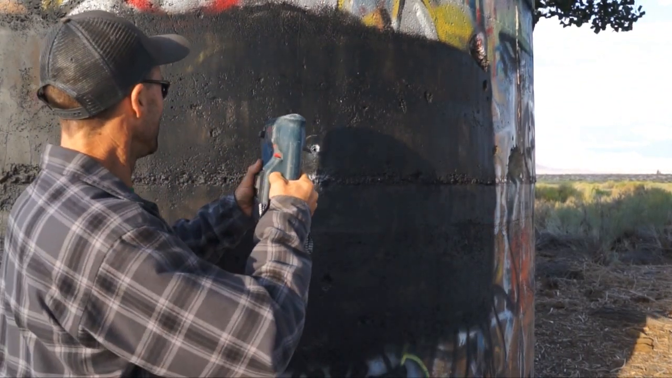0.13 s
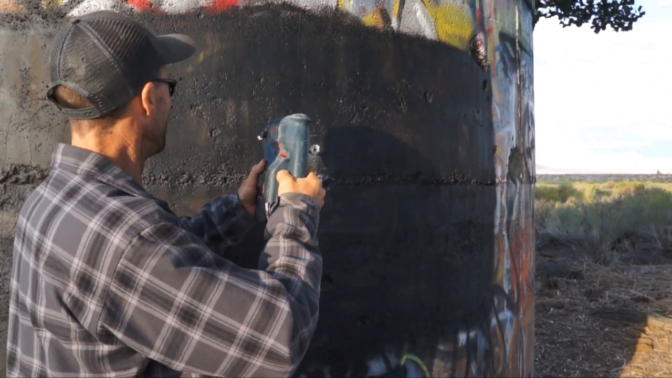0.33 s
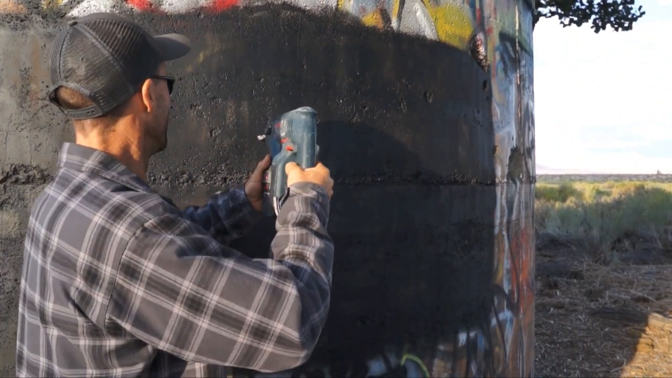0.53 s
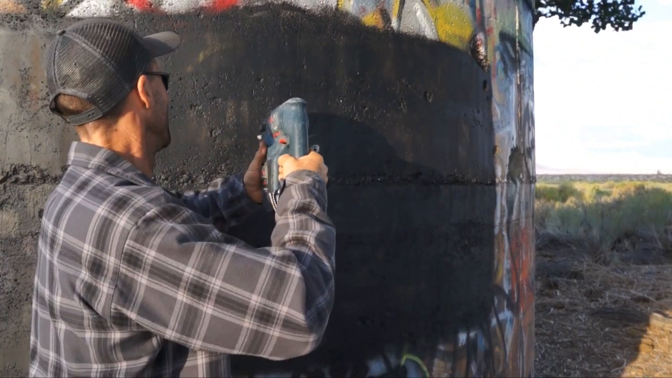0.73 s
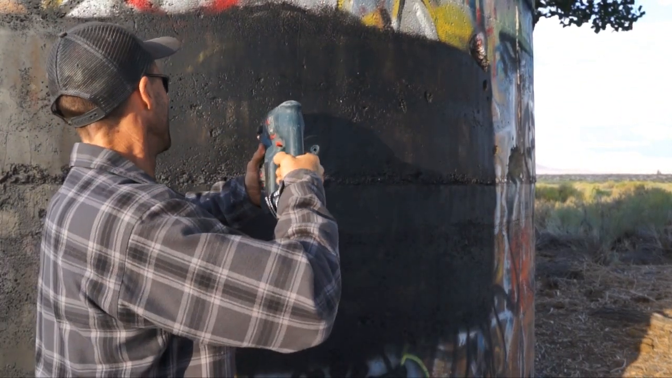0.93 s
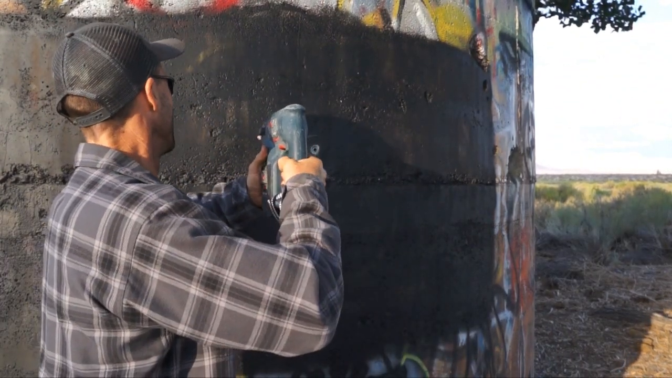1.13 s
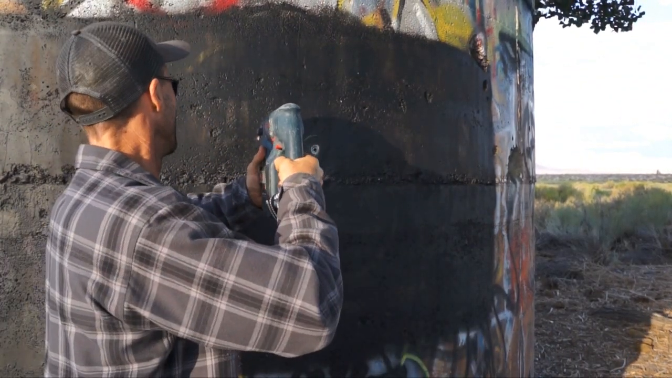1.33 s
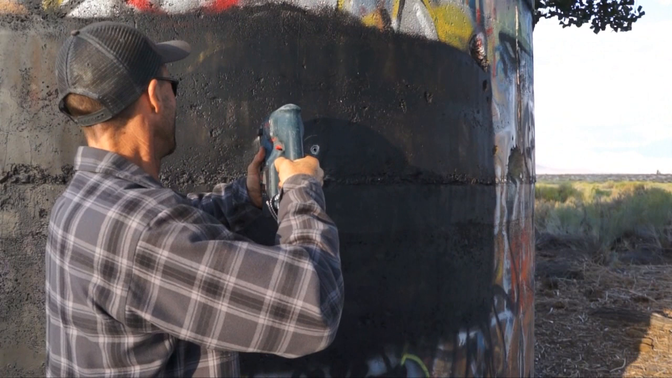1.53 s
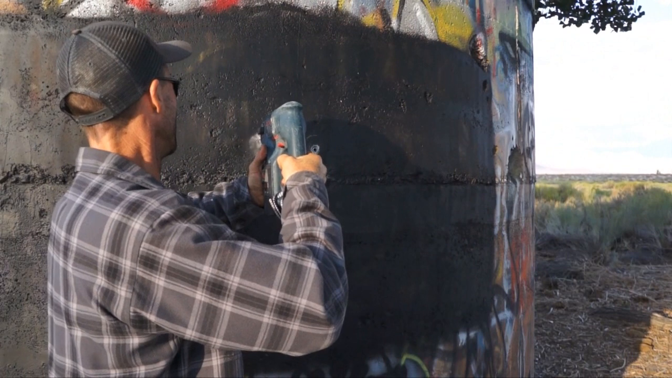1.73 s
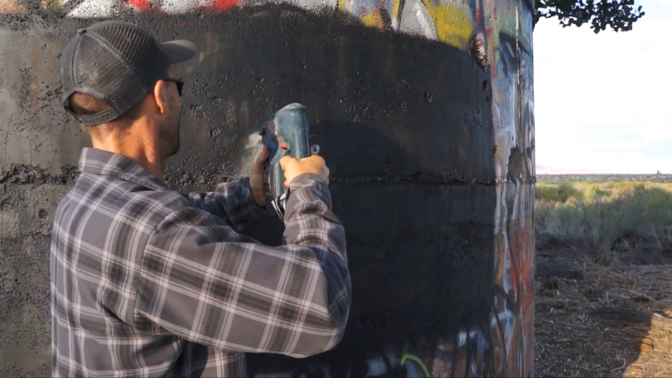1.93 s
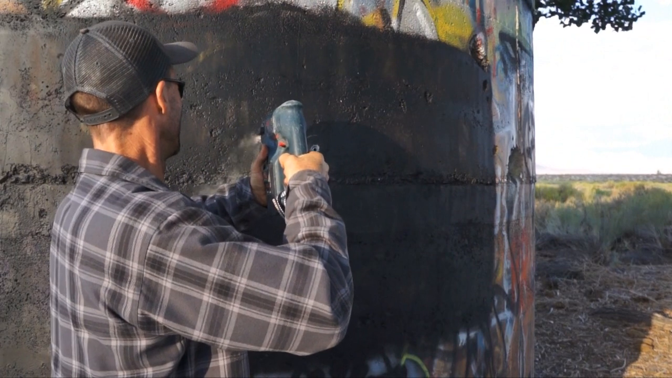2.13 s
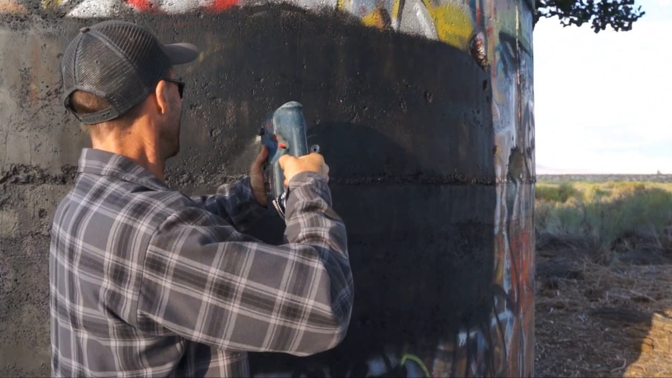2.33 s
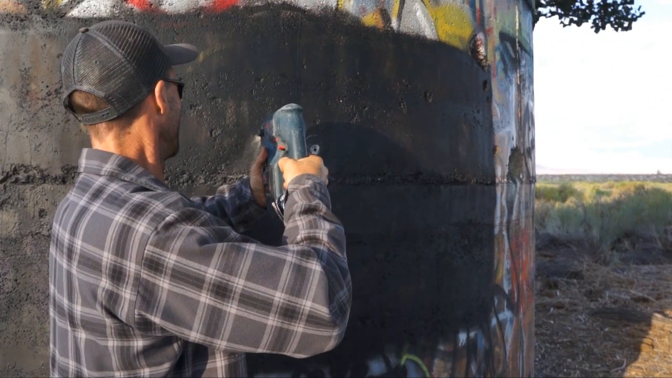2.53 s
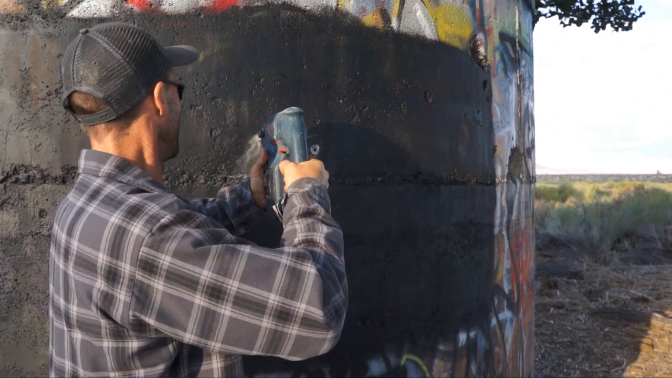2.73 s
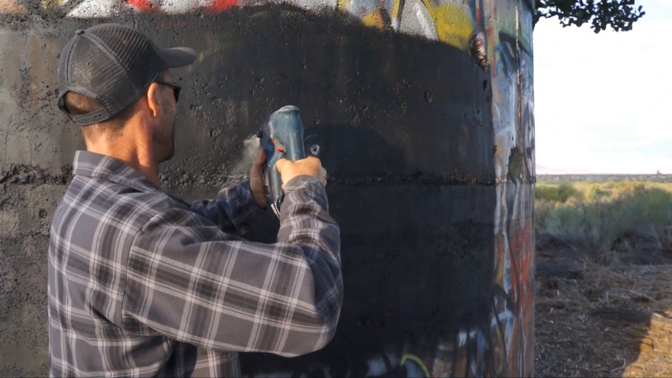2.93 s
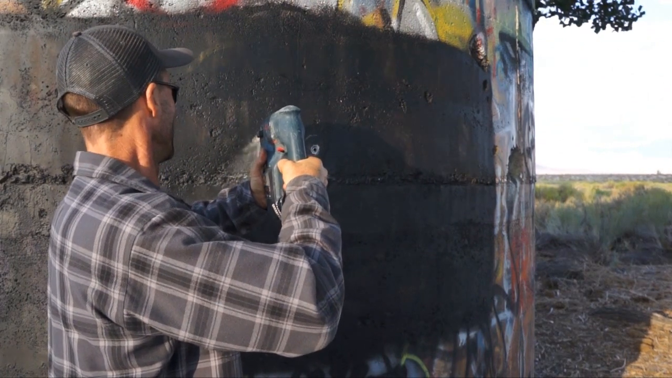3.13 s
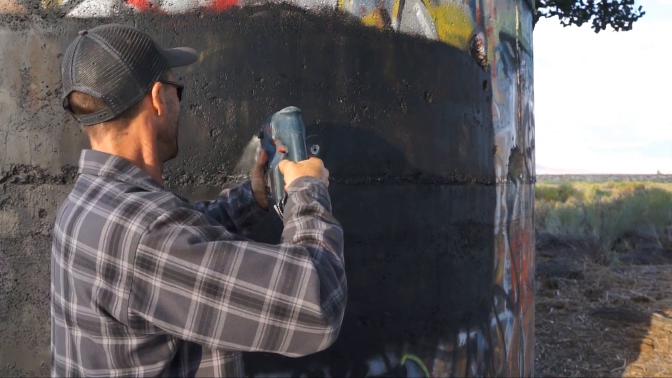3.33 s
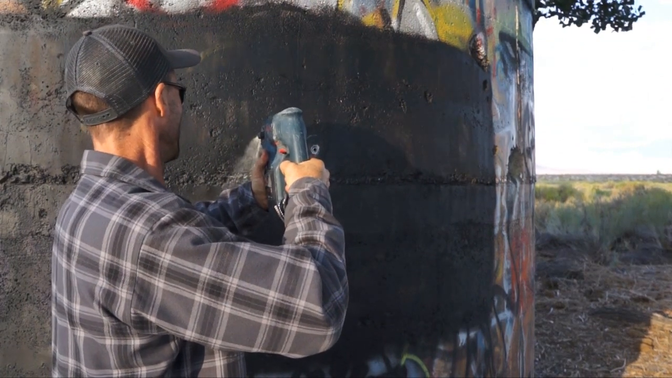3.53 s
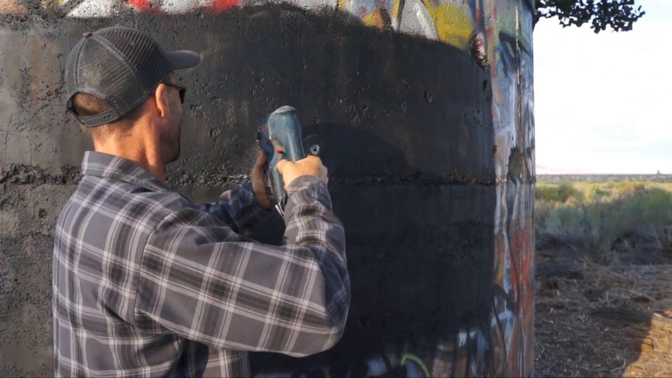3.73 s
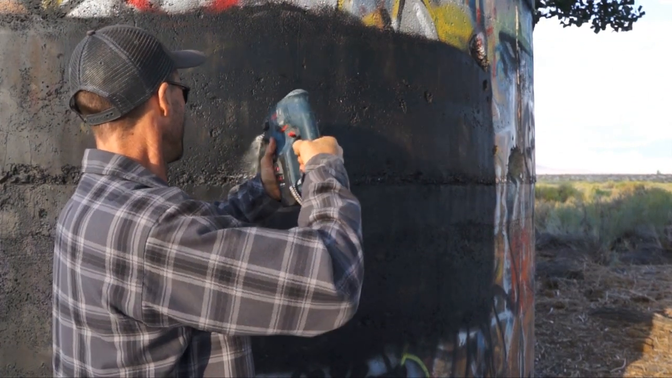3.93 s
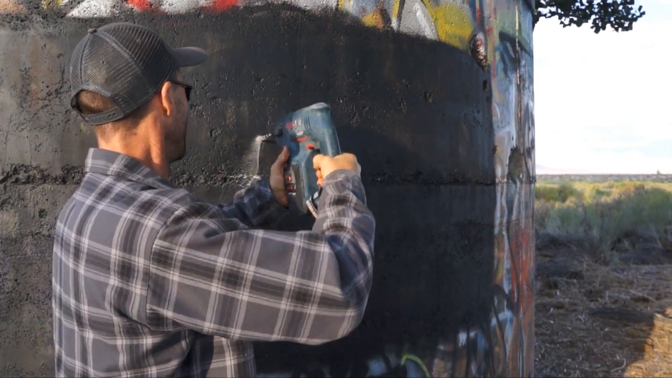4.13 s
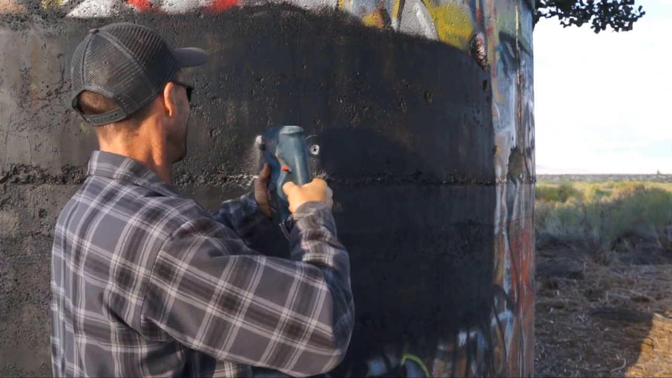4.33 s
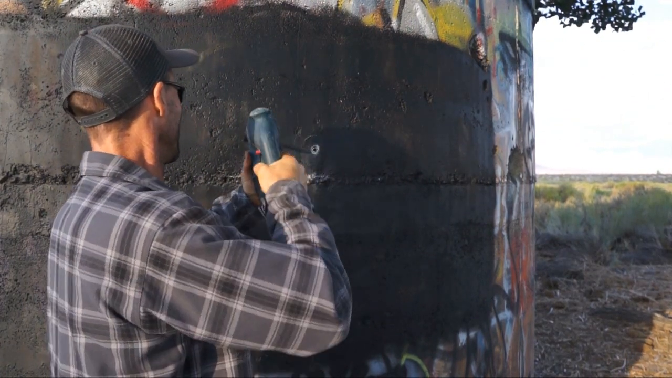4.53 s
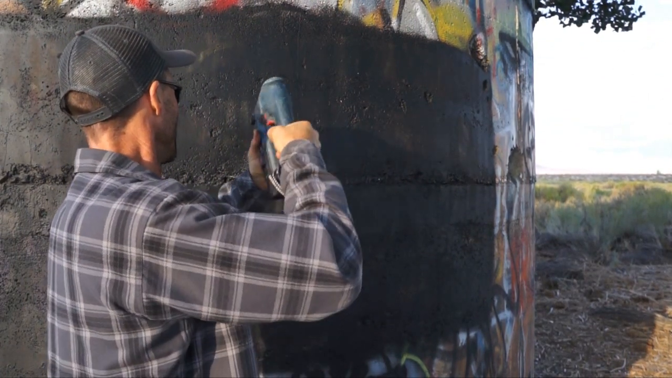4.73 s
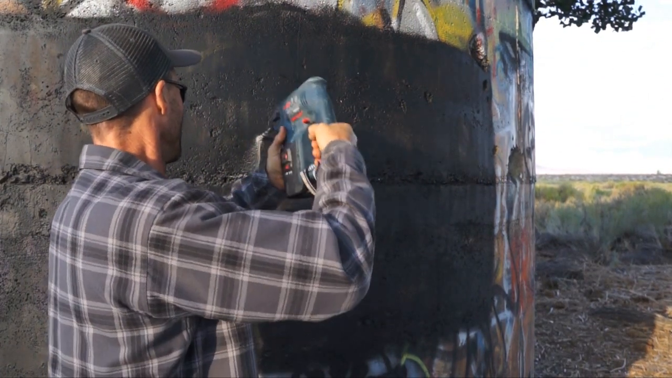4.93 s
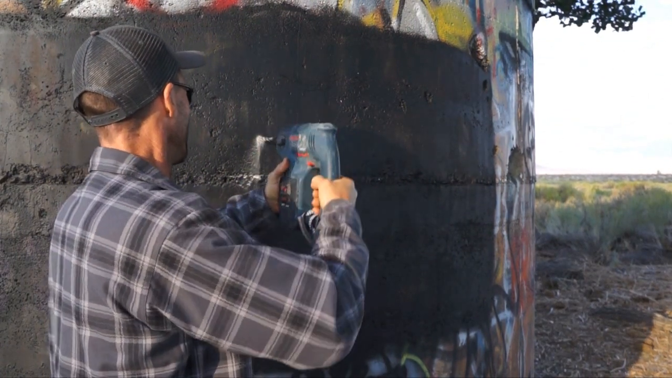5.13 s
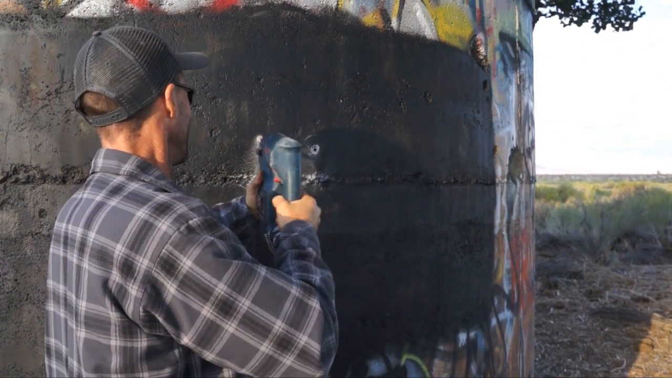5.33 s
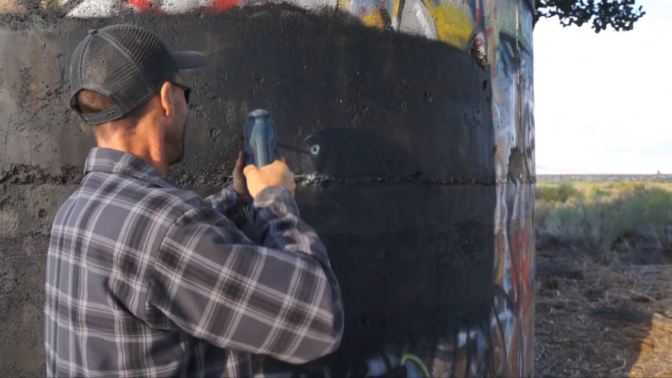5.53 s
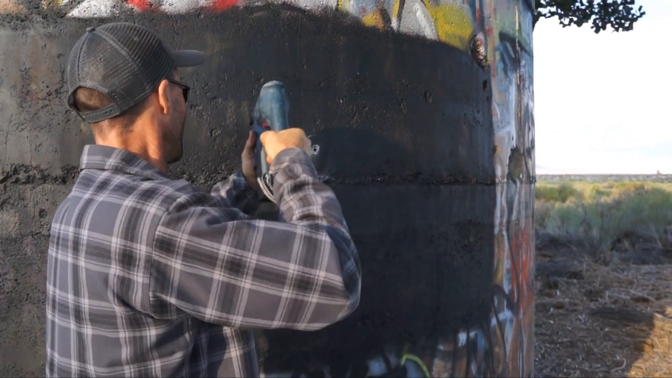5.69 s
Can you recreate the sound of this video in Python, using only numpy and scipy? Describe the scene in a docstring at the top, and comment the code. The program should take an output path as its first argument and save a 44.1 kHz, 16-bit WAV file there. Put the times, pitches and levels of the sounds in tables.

```python
"""Quiet open air outdoors; a tip taps, slides and rubs on a concrete wall while a rotary hammer is aimed, a little left.
The motor starts with fan air, grinding grit and a whine of gear tones. Pressed home twice, with a loose stretch between,
the piston strikes once a cycle and the bit rebounds and rings; eased off, the bit rattles, bounces and knocks in the hole.
The motor coasts, restarts for a short third spell of blows, then goes on rattling loosely to the end.
Contacts and air are shaped noise, ringing parts are damped resonances, and the whine is a set of sines."""
import sys
import numpy as np
from scipy import signal
from scipy.fft import rfft, irfft, next_fast_len
from scipy.io import wavfile
from scipy.ndimage import uniform_filter1d

SR = 44100
rng = np.random.default_rng(int(sys.argv[2]) if len(sys.argv) > 2 else 0)


def to_wav(sig):
    """Store sig (one row per channel, or 1-D mono) as 16-bit WAV at the path in sys.argv[1].

    Samples outside -1..1 are clipped; the rate is SR.
    """
    pcm = np.clip(np.atleast_2d(sig), -1, 1) * 32767
    pcm = np.round(pcm).astype(np.int16)
    wavfile.write(sys.argv[1], SR, pcm.T)  # frames by channels


N = 254016
TIME = np.arange(N) / SR  # s
# filter bins in Hz, padded so that ringing does not wrap around
FREQ = np.maximum(np.fft.rfftfreq(2 * next_fast_len(N // 2 + SR // 8, True), 1 / SR), 1)
SIZE = 2 * (len(FREQ) - 1)
FULL_SPEED_HZ = 75  # piston cycles a second


def undb(db):
    """Decibels to gain."""
    return 10 ** (np.asarray(db) / 20)


def curve(rows, axis=1):
    """One column of a table, joined by straight lines in time."""
    rows = np.asarray(rows)
    return np.interp(TIME, rows[:, 0], rows[:, axis])


def spectrum(rows, axis=1):
    """One column of a table, joined by straight lines over log frequency."""
    rows = np.asarray(rows)
    return np.interp(np.log(FREQ), np.log(rows[:, 0]), rows[:, axis])


def response(points, lifts=()):
    """Causal filter of unit power from a spectrum with resonant lifts."""
    db = spectrum(points)
    for hz, width, lift in lifts:
        db = db + lift / (1 + (2 * (FREQ - hz) / width) ** 2)
    # folding the cepstrum onto positive time gives minimum phase
    cepstrum = irfft(np.log(undb(db)))
    h = np.exp(rfft(cepstrum * 2 * (np.arange(SIZE) < SIZE // 2)))
    return h / np.sqrt(np.mean(abs(h) ** 2))


def modes(rows, order=1):
    """Damped resonances in parallel, of unit power; order 2 swells before it fades."""
    h = 0
    for k, (hz, width, db) in enumerate(rows):
        resonance = 1 / (1 + 1j * (FREQ ** 2 - hz ** 2) / (FREQ * width)) ** order
        h = h + (-1) ** k * undb(db) * resonance  # alternate signs
    return h / np.sqrt(np.mean(abs(h) ** 2))


def through(x, h):
    """Pass a signal through a filter."""
    return irfft(rfft(x, SIZE) * h)[:N]


# The microphone pair. Each row: frequency in Hz, left minus right in dB, unrelated share in dB.
MIC_PAIR = [(100, 0.5, -18), (724, 2, -19), (1500, 3.5, -9), (2800, 1.5, -14), (4700, 4, -4.5),
            (9250, 8.5, -8.5), (11100, 1.5, -8.5), (15000, 0.5, -2.5)]


def excite(envelope, h, treble_db=0, split_hz=4500):
    """Contact noise under an envelope drives a filter; the two capsules hear it partly alike."""
    drive = envelope * rng.standard_normal((2, N))
    upper = 1 / (1 + (split_hz / FREQ) ** 4)
    tilt = undb(treble_db / 2)
    bright = rfft(drive * tilt, SIZE) * upper
    dull = rfft(drive / tilt, SIZE) * (1 - upper)
    mid, side = h * (bright + dull)
    sides = np.array([[1], [-1]])
    pair = mid + sides * side * undb(spectrum(MIC_PAIR, axis=2))
    balance = undb(sides * spectrum(MIC_PAIR) / 2)
    return irfft(pair * balance)[:, :N]


def bursts(times, sizes, hold_s, t60_s):
    """Envelope of contacts that last a moment and then die away; they add in power."""
    power = np.zeros(N)
    for t, size, hold, t60 in np.broadcast(times, sizes, hold_s, t60_s):
        start = int(np.clip(t * SR, 0, N))
        age = TIME[:min(int((hold + t60) * SR), N - start)]
        decay = np.exp(-np.log(1000) * np.maximum(age - hold, 0) / t60)
        power[start:start + len(age)] += (size * decay) ** 2
    return np.sqrt(power)


def swells(rows):
    """Envelope of movements that swell and fade smoothly."""
    return sum(undb(db) * np.exp(-((TIME - middle) / half) ** 2) for middle, half, db in rows)


def wobble(rate):
    """Random levels held 1 / rate s and slewed, scaled to unit spread."""
    k = max(int(SR / rate), 1)
    steps = np.repeat(rng.standard_normal(N // k + 1), k)[:N]
    slewed = uniform_filter1d(steps, k)
    return slewed / slewed.std()


def held(times, values):
    """Each event's value holds until the next event, taking over 2 ms early."""
    return values[np.maximum(np.searchsorted(times, TIME + .002) - 1, 0)]


def spells(rows, values, rest):
    """A control that moves to each spell's value while the spell lasts and rests in between."""
    grip_change_s = 0.036
    control = rest
    for (start, end, *_), value in zip(rows, values):
        gate = np.clip(np.minimum(TIME - start, end - TIME) / grip_change_s + .5, 0, 1)
        control = control + gate * (value - rest)
    return control


# Colour of the open air. Each row: frequency in Hz, density in dB per Hz.
AIR = [(15, -28), (25, -15.5), (62, -17), (95, -10), (181, -8), (501, -8.5), (588, -1.5), (709, -14),
       (1280, -10), (1760, -15), (11800, -26), (13100, -32), (15000, -39)]


def outdoors():
    """Quiet open air, as slowly wavering noise with a faint high hiss."""
    lifts = [(616, 73, 3.9), (1390, 300, 4), (12950, 350, 10)]  # Hz, width Hz, dB
    return excite(undb(-62.5 + 1.6 * wobble(15)), response(AIR, lifts))


# Sleeve and glove rub while aiming. Each row: middle in seconds, half length in seconds, level in dB.
RUB = [(.1, .25, -69), (.355, 0.042, -55), (.97, 0.065, -53), (1.15, 0.14, -63)]
# The tip slides on the wall. Each row: middle in seconds, half length in seconds, level in dB.
SLIDE = [(.762, 0.036, -53.5), (.93, 0.12, -61.5)]
# Soft handling bumps. Each row: start in seconds, level in dB, t60 in seconds.
BUMPS = [(.064, -45, 0.16), (.1, -59, 0.14), (.335, -60, .3), (.385, -55, 0.31), (.93, -63, 0.6)]
# Taps of the tip on the wall and clicks of the tool. Each row: start in seconds, level in dB before a trim,
# treble against the middle in dB, t60 in seconds.
TAPS = [(.298, -48, -18, .05), (.321, -31, 0.5, 0.044), (0.627, -48, 6, .03), (0.7, -39.5, 3, 0.023),
        (0.928, -32.5, 3, 0.02), (.955, -43, -6, .03), (0.97, -33.5, -8, 0.011), (0.988, -38, -8, 0.019),
        (1.112, -35.5, 1, 0.029), (1.191, -52, -8, .027), (1.238, -29.5, 12.5, 0.076),
        (1.264, -33, -12, 0.1), (1.285, -18.5, 12, 0.061), (3.769, -24.5, 26, 0.011)]
# Colour of a tap. Each row: frequency in Hz, density in dB per Hz.
TAP_COLOUR = [(60, -33), (300, -8.5), (800, 4.5), (1100, 4.5), (1600, -1), (2400, -7), (3500, -10),
              (6000, -17), (9000, -15), (12000, -26), (15000, -47)]


def aiming():
    """The tip taps and slides on the concrete; cloth rubs and the grip bumps softly."""
    t, db, treble, t60 = np.transpose(TAPS)
    contacts = bursts(t, undb(db - 2.5), hold_s=0.0005, t60_s=t60)
    taps = excite(contacts, response(TAP_COLOUR, BODY), treble_db=held(t, treble))
    # colours below: Hz, dB per Hz
    cloth = response([(60, -5), (300, -3.0), (1100, -2.0), (3000, -17.5), (10000, -29), (15000, -40)])
    catching = undb(2.5 * wobble(150))
    rub = excite(swells(RUB) * catching, cloth)
    scrape = response([(200, -1), (1500, 0), (4000, -7), (9000, 1), (12000, -11), (15000, -22)])
    slide = excite(swells(SLIDE), scrape)
    t, db, t60 = np.transpose(BUMPS)
    soft = response([(20, -3), (60, 6), (180, -1), (320, -34), (1500, -60)])
    bumps = excite(bursts(t, undb(db), hold_s=0.0066, t60_s=t60), soft)
    return taps + rub + slide + bumps


# The motor starts, bogs down as the bit bites, runs up, coasts and restarts.
# Each row: time in seconds, piston cycles a second.
SPEED = [(1.23, 15.0), (1.31, 45.6), (1.42, 44.8), (1.53, 33.9), (1.615, 33.1), (1.72, 65.7), (1.79, 73.2),
         (2.62, 75.2), (2.72, 79.0), (3.05, 75.8), (3.57, 74.2), (3.75, 35.8), (3.84, 67.0), (4.0, 71.2),
         (4.16, 76.2), (4.62, 74.7), (5.45, 76.5), (5.76, 73.5)]


def motor_speed():
    """Piston rate over time, which sets every cycle and tone of the tool."""
    return curve(SPEED)


# Trigger held. Each row: on in seconds, off in seconds.
TRIGGER = [(1.232, 3.58), (3.736, 5.9)]


def motor_power():
    """Level against full power (dB): a quick rise when the trigger is pulled, a slower fall as the motor coasts."""
    spin_up_s, spin_up_db_per_s, coast_db_per_s = .065, 546, 248
    pulls = []
    for on, off in TRIGGER:
        rise = spin_up_db_per_s * (TIME - on - spin_up_s)
        fall = coast_db_per_s * (off - TIME)
        pulls.append(np.minimum(rise, fall))
    return np.clip(np.max(pulls, axis=0), -90, 0)


# Strokes with the bit loose in the hole. Each row: start in seconds, end in seconds, rattle in dB,
# grinding in dB, free running in dB (raises the whine tones by their own growth).
EASED = [(2.066, 2.673, -23.5, -24, -3), (3.954, 4.232, -38.5, -26.5, 4.5), (4.24, 4.613, -28.5, -26, -8),
         (4.61, 4.89, -25, -24, 0.5), (4.9, 5.177, -27, -25, 6.5), (5.19, 5.9, -26.5, -26, -5)]


def looseness():
    """1 while the bit is loose in the hole, else 0, with short ramps between."""
    return spells(EASED, np.ones(len(EASED)), rest=0)


# Colour of fan and grit. Each row: frequency in Hz, density in dB per Hz.
WHIRR = [(29, -52), (50, -39), (91, -37), (141, -22.5), (311, -13.5), (446, -8.5), (596, -5.5), (1040, -3),
         (1890, -4), (2580, -4.5), (3060, -2.5), (4600, -6), (9250, -3), (11500, -11), (15700, -27.5)]
# The housing booms when the motor labours or the load comes off.
# Each row: middle in seconds, half length in seconds, level in dB.
BOOM = [(1.55, .1, -42.5), (2.02, 0.058, -50.5), (3.59, 0.063, -45.5), (3.94, 0.031, -47), (4.8, .09, -49)]
# Motor and gear tones. Each row: multiple of the piston rate, level in dB, dB gained per dB of free running.
TONES = [(2, -65, .1), (20, -46, .2), (35, -42, .5), (70, -43, .8), (93.4, -49, 1), (114, -47, .8)]


def machine(turns):
    """Fan air and flutes grinding grit, a booming housing, and the slightly unsteady tones of armature and gears."""
    loaded_grind_db, loaded_free_db = -23.5, -37
    *_, grind_db, free_db = np.transpose(EASED)
    power = motor_power()
    grit = undb(2.7 * wobble(1500) + 1.47 * wobble(120) - 3.0)
    # brighter when loose and with motor power
    treble = -2 + 2.5 * looseness() + 0.13 * power
    level = undb(spells(EASED, grind_db, rest=loaded_grind_db) + power)
    whirr = excite(level * grit, response(WHIRR, BODY), treble_db=treble)
    boom = excite(swells(BOOM), modes([(150, 60, -2), (272, 50, 0)], order=2))
    shaft = turns + .0009 * wobble(60)
    free = spells(EASED, free_db, rest=loaded_free_db)
    tones = 0
    for order, db, growth in TONES:
        loudness = np.sqrt(2) * undb(db + growth * free + 1.94 * wobble(40))
        tones = tones + loudness * np.sin(2 * np.pi * order * shaft)
    # the piston's load roughens the whine once a cycle
    tones = tones * (1 + .5 * np.cos(2 * np.pi * turns)) * undb(3 * wobble(350) - 1.5)
    # the whine falls away steeply as the motor slows
    whine = tones * (motor_speed() / FULL_SPEED_HZ) ** 5 * undb([[2.5], [-.5]])
    return whirr + boom + whine


# Resonances of steel bit and housing. Each row: frequency in Hz, width in Hz, lift in dB.
BODY = [(260, 9.9, 5.5), (462, 29, 5), (780, 31, 4), (1054, 52, 3), (1247, 73, 3.5), (1486, 37, 7.5),
        (1764, 49, 5), (1860, 17, -9.5), (2225, 230, 5.5), (2620, 110, 7), (3460, 1700, -1), (4360, 140, 3),
        (7170, 570, 2.5), (8600, 200, 0.5), (9470, 2140, 6)]
# Colour of the loose bit. Each row: frequency in Hz, density in dB per Hz.
LOOSE = [(47, -59), (80, -47), (145, -17.5), (270, -9.5), (315, -11.5), (778, 1), (1350, -1), (1480, 0.5),
         (1880, -4.5), (2620, 0), (3130, -3), (4660, -5), (9240, -4), (11500, -4.5), (15700, -36)]
# The hardest knocks of the loose bit. Each row: start in seconds, level in dB before a trim,
# treble against the middle in dB before scaling and trim.
KNOCKS = [(1.304, -21, -2), (1.326, -16, 2), (2.062, -14.5, -4), (2.164, -16.5, -8), (2.214, -20, -6),
          (2.268, -18, -7), (2.384, -14.5, 1), (2.408, -14.5, 0), (2.573, -12.5, 2), (2.624, -13.5, 1),
          (3.995, -21.5, 13), (4.023, -16.5, 8.5), (4.222, -16, 4.5), (4.259, -18.5, 7), (4.354, -14.5, 6),
          (4.363, -15, 9), (4.411, -15, 5), (4.432, -18, -4), (4.506, -22, 10), (4.564, -19, 1),
          (4.62, -18, -4), (4.764, -22, -9), (4.864, -18.5, -5), (4.921, -12.5, 6), (5.092, -16, 10),
          (5.155, -18, 11), (5.208, -13.5, 6), (5.233, -14.5, 3), (5.263, -16.5, 7), (5.344, -14.5, 7),
          (5.457, -17.5, -1), (5.508, -19.5, -6), (5.588, -14, 0), (5.618, -16.5, 5)]
# Spells with the bit pressed home. Each row: first blow in seconds, end in seconds, blow in dB at full speed,
# bit ring in dB at full speed, rebound chirp in dB before a trim, crack treble in dB, rattle in dB.
PRESSED = [(1.3337, 2.005, -19.5, 2.5, -6.5, -1.5, -27), (2.6675, 3.574, -21.5, 1.5, -13, 1.5, -33),
           (3.796, 3.94, -23.5, 3.5, -11, 2, -29)]


def rattle(turns):
    """The loose bit hits the hole at chance moments in each cycle, bounces off its bottom and knocks hard at set times."""
    levels = [row[-1] for row in PRESSED] + [row[2] for row in EASED]
    play = undb(spells(PRESSED + EASED, levels, rest=-45) + motor_power())
    # two small contacts a cycle
    cycles = np.arange(0, turns[-1], .5)
    chance = rng.uniform(-1, 1, (len(cycles), 3)).T
    t = np.interp(cycles + .3 * chance[0], turns, TIME)
    small = bursts(t, undb(1.0 + 4.0 * chance[1]), hold_s=0.0012, t60_s=0.021 * np.exp(.5 * chance[2]))
    # bounces off the bottom of the hole, mostly a bright clink
    bounce_s, jitter_s, bounce_db, scatter_db = .0245, .006, 2, 2.5  # levels against the rattle
    chance = rng.uniform(-1, 1, (N // 800, 2)).T
    t = bounce_s * np.arange(len(chance[0])) + jitter_s * chance[0]
    bounces = bursts(t, undb(bounce_db + scatter_db * chance[1]), hold_s=0.0017, t60_s=0.011) * looseness()
    t, db, treble = np.transpose(KNOCKS)
    hard = bursts(t, undb(db - 2), hold_s=.002, t60_s=.018)
    h = response(LOOSE, BODY)
    return (excite(small * play, h, treble_db=2.5 * wobble(120))
            + excite(bounces * play, h, treble_db=3.5 + 3.5 * wobble(40))
            + excite(hard, h, treble_db=1.05 * held(t, treble) - 2.5))


# Colour of a blow on the stone. Each row: frequency in Hz, density in dB per Hz.
STRIKE = [(59, -57), (100, -69), (140, -58), (223, -22), (421, -24), (762, -1), (1380, -4.5), (1470, 2.5),
          (1890, -1), (2550, 4), (2890, -20), (3890, -3), (10100, 1), (14100, -7), (15700, -46)]
# Modes of the bit under a full blow. Each row: frequency in Hz, width in Hz, level in dB.
BIT = [(2490, 350, 3.5), (9000, 100, -2.5), (10280, 760, 2.5)]
# Low modes of housing and wall, shaken by each blow. Each row: frequency in Hz, width in Hz, level in dB.
SHELL = [(79, 26, -28), (146.3, 8.9, -5), (226, 33, -2.5), (289, 26, 1.5), (386, 23, 1), (469, 42, 1.5),
         (539, 68, 5), (874, 395, 4.5)]


def hammer(turns):
    """One blow a cycle while pressed home; a few milliseconds later the bit rebounds and chatters in the chuck."""
    blow_times = []
    for start, end, *_ in PRESSED:
        first, last = np.interp((start, end), TIME, turns)
        blow_times.append(np.interp(np.arange(first, last), turns, TIME))
    t = np.concatenate(blow_times)
    chance = rng.uniform(-0.71, 1, (len(t), 6)).T
    starts, _, blow_db, ring_db, chirp_db, treble_db, _ = np.transpose(PRESSED)
    # dB per octave of speed: harder and ringing when fast, shaking when slow
    blow_db_per_oct, ring_db_per_oct, shake_db_per_oct = 2, 3.5, -5
    octaves = np.log2(motor_speed() / FULL_SPEED_HZ)
    force = undb(held(starts, blow_db) + blow_db_per_oct * octaves)
    ring = undb(held(starts, ring_db) + ring_db_per_oct * octaves)
    shake = undb(-15.5 + shake_db_per_oct * octaves)
    size = undb(1.0 * chance[0])
    blow = bursts(t, size, hold_s=0.0025, t60_s=0.0092)
    back = t + .0048 + 0.00036 * chance[1]
    rebound = bursts(back, undb(-0.5 + 5.5 * chance[2]), hold_s=0.0022, t60_s=0.009)
    chatter_t = back + .0026 + 0.0011 * chance[3]
    chatter = bursts(chatter_t, undb(-10.5 + 9.7 * chance[4]), hold_s=0.00033, t60_s=0.014)
    # the bit's own ring fills this band, so the stone leaves room for it
    bit_hz, bit_width, _ = BIT[0]
    stone = response(STRIKE, BODY) / (1 + 0.23 / (1 + ((FREQ - bit_hz) / bit_width) ** 2))
    contacts = np.sqrt(blow ** 2 + rebound ** 2 + chatter ** 2)
    crack = excite(force * contacts, stone, treble_db=held(starts, treble_db))
    # each blow kicks the bit and the housing in much the same way: a firm buzz
    kicks = np.zeros(N)
    kicks[((t + .00008 * chance[5]) * SR).astype(int)] = size * np.sqrt(SR / FULL_SPEED_HZ)
    steel = through(kicks * force * ring, modes(BIT, order=2)) * undb([[-5.5], [-9]])
    thump = through(kicks * force * shake, modes(SHELL)) * undb([[0], [-1.5]])
    # the rebound rings the steel striker, very high
    chirp = undb(held(starts, chirp_db) - 6)
    ping = excite(rebound * force * chirp, modes([(15270, 150, 0)], order=2))
    return crack + steel + thump + ping


def scene():
    """One motor shaft times the blows, the rattle and the tones; the small tool radiates little deep bass."""
    turns = np.cumsum(motor_speed()) / SR
    background = outdoors() + aiming()
    drill = machine(turns) + rattle(turns) + hammer(turns)
    bass_cut = signal.butter(2, 55, "high", fs=SR, output="sos")
    return background + signal.sosfilt(bass_cut, drill)


def record(dry):
    """The recorder slightly rounds the highest peaks and cuts the top."""
    ceiling, top_hz = .78, 15800
    rounded = ceiling * np.tanh(dry / ceiling)
    return signal.sosfilt(signal.ellip(10, .2, 80, top_hz, fs=SR, output="sos"), rounded)


dry = scene()
out = record(dry)
to_wav(out)
```